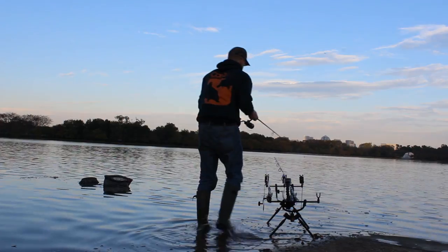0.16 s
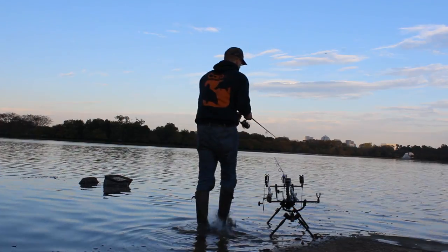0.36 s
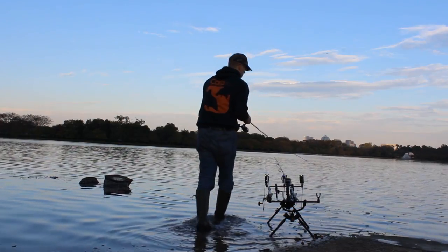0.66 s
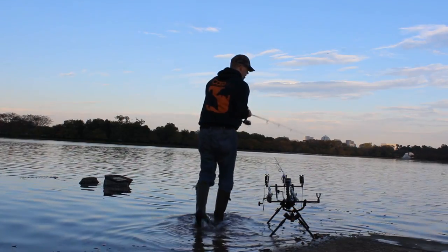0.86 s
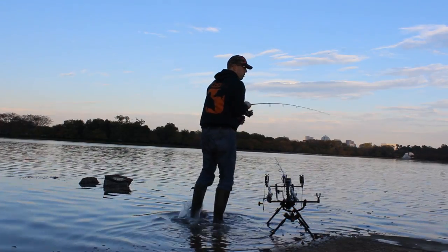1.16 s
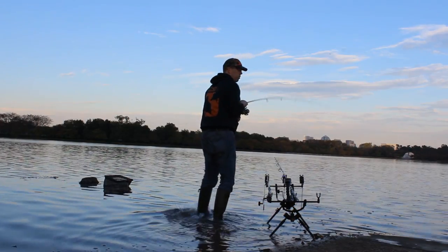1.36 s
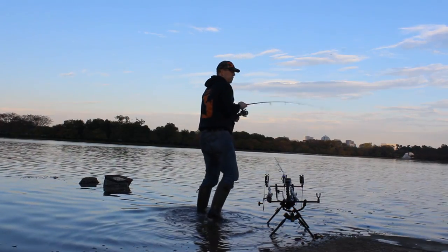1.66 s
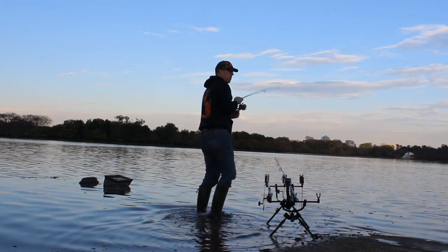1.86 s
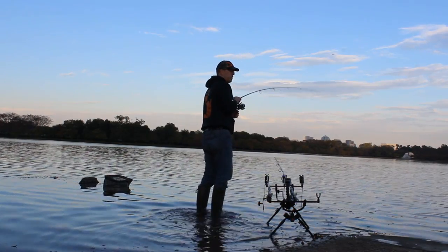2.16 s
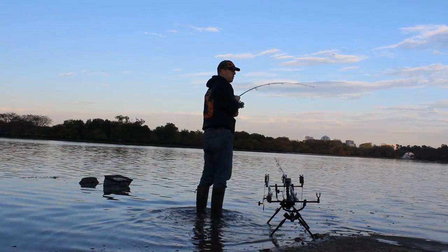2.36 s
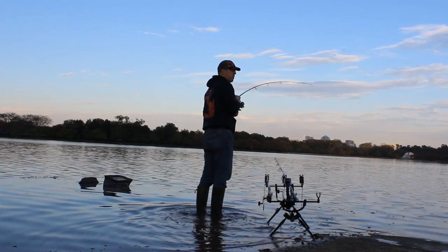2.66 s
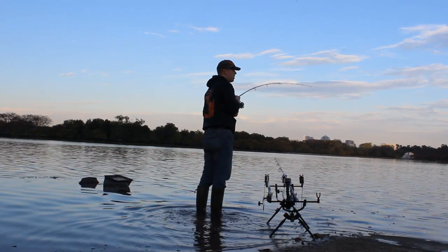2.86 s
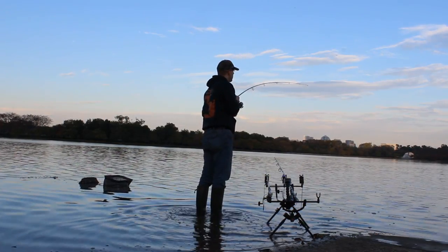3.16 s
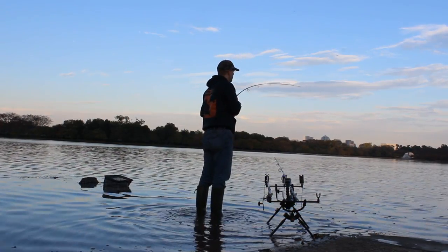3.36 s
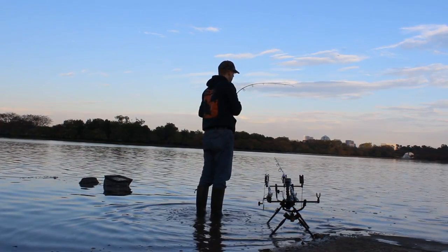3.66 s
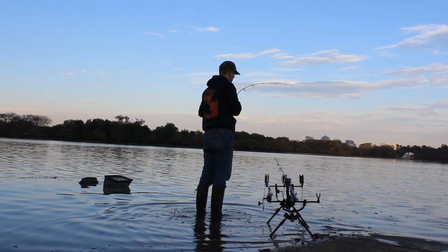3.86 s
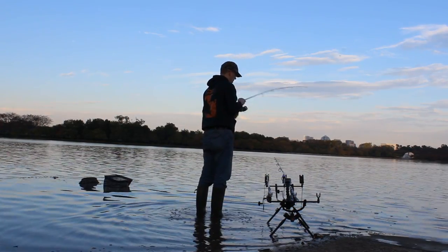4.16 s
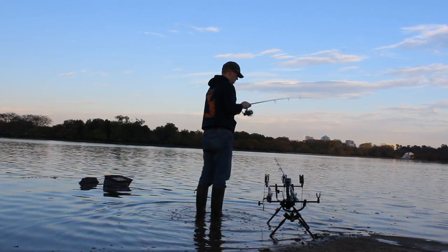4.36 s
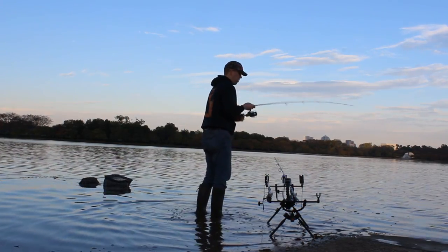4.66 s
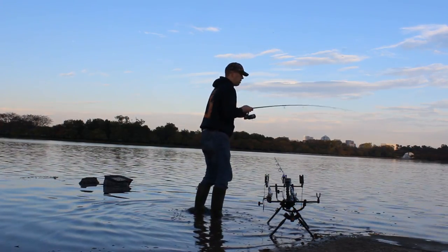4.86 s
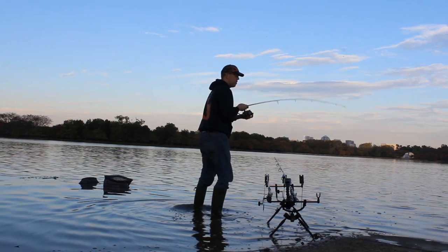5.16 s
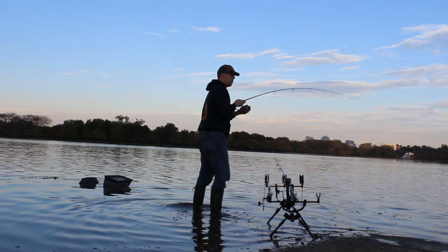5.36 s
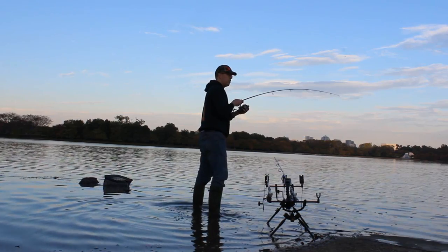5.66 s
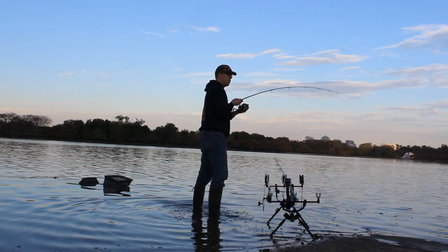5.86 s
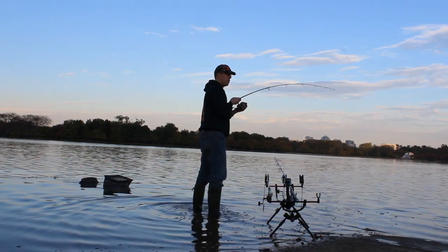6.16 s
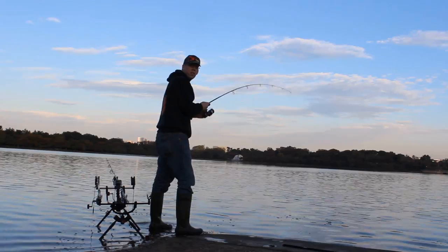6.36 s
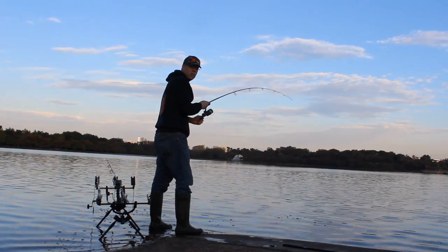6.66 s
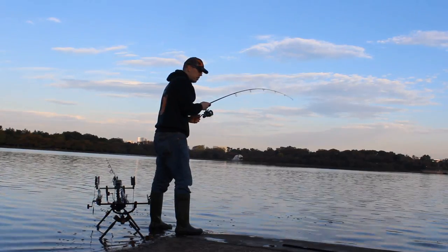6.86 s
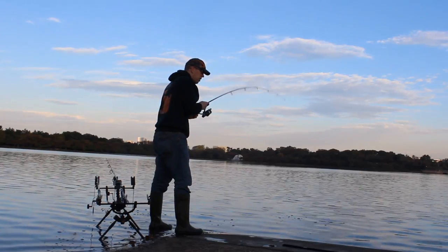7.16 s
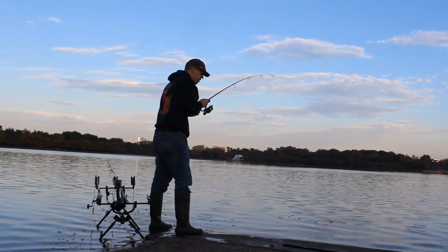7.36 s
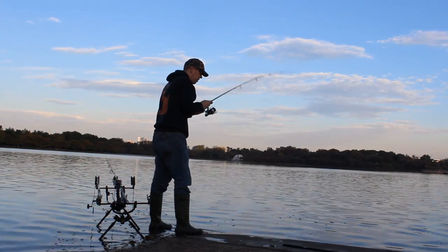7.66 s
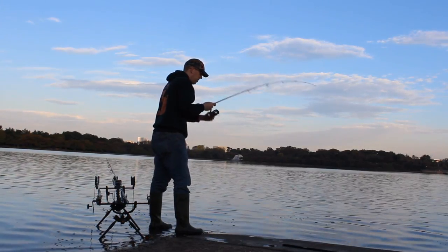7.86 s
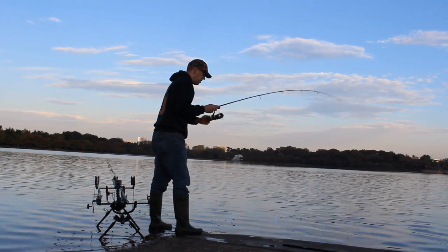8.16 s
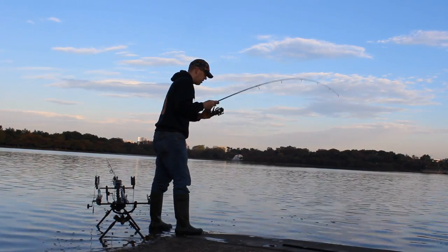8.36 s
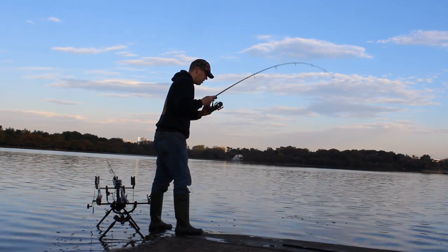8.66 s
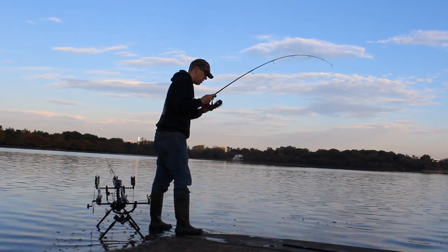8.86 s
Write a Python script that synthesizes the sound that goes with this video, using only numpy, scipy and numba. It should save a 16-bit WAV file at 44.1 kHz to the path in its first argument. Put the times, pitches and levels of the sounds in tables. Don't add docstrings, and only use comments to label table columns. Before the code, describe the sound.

A fishing reel clicks in bursts and stray ticks as boots slosh in shallow lake water, over distant engine revs and low road rumble.

```python
import sys
import numpy as np
from scipy import signal
from scipy.fft import rfft, irfft
from scipy.io import wavfile
from scipy.ndimage import uniform_filter1d
from numba import njit

SR = 44100
rng = np.random.default_rng(int(sys.argv[2]) if len(sys.argv) > 2 else 0)


def undo_db(level):
    steps = np.asarray(level, float) / 20
    return 10 ** steps


def generate_wav(sig):
    pcm = np.round(np.clip(np.atleast_2d(sig).T, -1, 1) * 32767).astype(np.int16)
    wavfile.write(sys.argv[1], SR, pcm)


N = 396900


def level(x, rms_db):
    return x * undo_db(rms_db) / np.sqrt(np.mean(x ** 2))


def curves(table):
    at_s, *columns = np.transpose(table)
    t = np.arange(N) / SR
    gate = uniform_filter1d(1. * (t > at_s[0]) * (t < at_s[-1]), size=200)
    return [np.interp(t, at_s, c) for c in columns] + [gate]


@njit
def band(x, hz, width_hz):
    y, b, l = np.empty(len(x)), 0., 0.
    g, k = np.tan(np.pi * hz / SR), width_hz / hz
    for i in range(len(x)):
        v = (b + g * (x[i] + 1e-18 - l)) / (1 + g * (g + k))
        b, l, y[i] = 2 * v - b, l + 2 * g * v, k * v
    return y


@njit
def bubbles(start_s, size, hz, t60_s, glide):
    out = np.zeros(N)
    for e in range(len(start_s)):
        i0, n, phase = int(start_s[e] * SR), int(t60_s[e] * SR), 0.
        for i in range(min(n, N - i0)):
            phase += 2 * np.pi * min(hz[e] * (1 + glide[e] * i / n) / SR, .45)
            out[i0 + i] += size[e] * np.sin(phase) * np.exp(-6.9 * i / n) * min(phase / 12, 1.)
    return out


def walk(rate_hz):
    hold = int(SR / rate_hz)
    steps = np.repeat(rng.standard_normal(N // hold + 1), hold)
    return 1.623 * uniform_filter1d(uniform_filter1d(steps, hold), hold)[:N]


def bursts(start_s, peak_db, rise_s, fall_s):
    marks = np.zeros(N)
    np.add.at(marks, (np.asarray(start_s) * SR).astype(int), undo_db(peak_db))
    t = np.arange(1500) / SR
    puff = (1 - np.exp(-(t / rise_s) ** 2)) * np.exp(-(t / fall_s) ** 2)
    return signal.fftconvolve(marks, puff)[:N] * np.sign(rng.standard_normal(N))


# start_s, teeth_passed
SPOOL_RUNS = [
    [(.1655, 0), (.1883, 1), (.2195, 3), (.2523, 5), (.3112, 8), (.3431, 10), (.3838, 14), (.4304, 20),
     (.4853, 30)],
    [(1.8832, 0), (1.9032, 1), (1.914, 2), (1.9575, 7)],
    [(2.3641, 0), (2.4016, 2), (2.4235, 3), (2.4564, 5), (2.5033, 7), (2.5662, 9), (2.5916, 10),
     (2.633, 11)],
    [(5.0828, 0), (5.1143, 1), (5.139, 2), (5.158, 3), (5.2014, 6), (5.247, 9), (5.2649, 10), (5.2929, 11)],
]
# first_db, last_db, body_db (against the pawl)
RUN_LEVELS = [
    (-29, -27.5, -13),
    (-41, -41, -11),
    (-42, -46, -8),
    (-41, -39, -4),
]


def spool_clicks():
    tooth_scatter_db, body_scatter_db = 2, 2.5
    clicks = []
    for run, (first_db, last_db, body_db) in zip(SPOOL_RUNS, RUN_LEVELS):
        at_s, teeth = np.transpose(run)
        tooth = np.arange(teeth[-1] + 1)
        chance = rng.standard_normal((len(tooth), 2)).T
        start_s = np.interp(tooth, teeth, at_s)
        peak_db = np.linspace(first_db, last_db, len(tooth)) + tooth_scatter_db * chance[0]
        clicks += list(np.transpose([start_s, peak_db, body_db + body_scatter_db * chance[1]]))
    return clicks


# start_s, peak_db, body_db
CHURN_CLICKS = [(0.5807, -39, -2), (0.6141, -38, 5), (0.6745, -38, 3), (0.7473, -37, -9), (0.8224, -43, 9),
                (0.864, -39, -8), (.9104, -47, -14), (.9843, -40, -8), (1.0835, -40.5, -3),
                (1.123, -42, -8), (1.1329, -46, -2), (1.1557, -35, -1), (1.2761, -33, -7), (1.3006, -44, 0),
                (1.3639, -40, 2), (1.4772, -30, -14), (1.5954, -43, -8), (1.6398, -39.5, 4),
                (1.6787, -43, -2), (1.7136, -40, -11), (1.752, -38, -7), (1.989, -41, -11),
                (2.1052, -43, -4), (2.1801, -44, -4), (2.2439, -44, -9), (2.2714, -40, -8),
                (2.3153, -37, -18)]
# start_s, peak_db, body_db
STANDING_CLICKS = [(2.7303, -37, -21), (2.7548, -41, -5), (2.9302, -41, -5), (3.1239, -42, -6),
                   (3.2656, -41, -6), (3.3933, -41, -5), (3.4865, -47, 0), (3.5415, -49, -10),
                   (3.5938, -48, 1), (3.6707, -48, 0), (3.8363, -49, -5), (4.0557, -51, -5),
                   (4.1341, -48, -3), (4.7382, -47, -7), (4.8171, -48, 0), (4.9267, -42.5, 0),
                   (5.037, -42, 7), (5.3094, -45, -6), (5.3747, -42, -2), (5.3991, -45, -8),
                   (5.7984, -37, -11), (6.5909, -39.5, -3), (6.761, -38, -6), (6.9133, -37.5, -6),
                   (7.2487, -40.5, -2), (8.985, -34, -6)]
# mode_hz, width_hz, gain_db
PAWL_MODES = [
    (6600, 620, -3),
    (8500, 1700, -5.5),
    (9830, 1200, -0.5),
    (12160, 1200, -1),
    (13300, 830, 1.5),
    (14200, 1300, -1),
    (15100, 1400, -3),
]


def clicker():
    clicks = list(CHURN_CLICKS) + list(STANDING_CLICKS) + spool_clicks()
    start_s, peak_db, body_db = np.transpose(clicks)
    snap = bursts(start_s, peak_db, rise_s=0.00053, fall_s=0.0027)
    pawl = 0
    for k, (mode_hz, width_hz, gain_db) in enumerate(PAWL_MODES):
        pawl = pawl + (-1) ** k * undo_db(gain_db) * band(snap, 1. * mode_hz, 1. * width_hz)
    body_hz, none = 4200., 0 * start_s
    t60_s = .007 + none
    scattered_hz = body_hz * (1 + 0.023 * rng.standard_normal(len(start_s)))
    body = bubbles(start_s + .0005, undo_db(peak_db + body_db), scattered_hz, t60_s, none)
    rim = bubbles(start_s + 0.00045, undo_db(peak_db + body_db - 3.5), 1.1 * body_hz + none, t60_s, none)
    return undo_db(4.0) * pawl + undo_db(12.0) * (body + rim)


WADING_ENDS_S = 5.5


def swarm(per_s, lo_hz, hi_hz, cycles, scatter_db):
    when, pitch, bulk, ring = rng.random((int(per_s * WADING_ENDS_S), 4)).T
    hz = lo_hz * (hi_hz / lo_hz) ** pitch ** 0.706
    size = undo_db(-scatter_db * np.log(bulk + 2e-3))
    out = bubbles(when * WADING_ENDS_S, size, hz, cycles * (.5 + ring) / hz, 0.07 + 0 * hz)
    return out / out[:int(WADING_ENDS_S * SR)].std()


# peak_s, slosh_db, rise_s (per 10 dB), fall_s (per 10 dB), spray_db (against the slosh)
BOOT_PUSHES = [(.2, -44, 0.018, 0.4, -8), (.48, -38.5, 0.19, 0.25, -3), (.7, -43, 0.25, .12, -5),
               (.83, -64, .02, 0.2, -4), (1.06, -43.5, 0.1, 0.067, -4), (1.17, -38.5, 0.056, 0.1, -3.5),
               (1.29, -42.5, 0.075, 0.25, -8), (1.41, -39.5, 0.16, 0.13, -3),
               (1.51, -42, 0.058, 0.11, -6.5), (1.93, -50, .09, 0.32, -6), (2.11, -52, 0.027, .06, -2),
               (2.19, -41, 0.034, 0.037, -5), (2.44, -60, .2, 0.19, 0), (5.25, -49.5, 0.13, 0.15, -5.5),
               (5.39, -56, 0.036, .1, 0)]


def wading():
    slosh = swarm(per_s=2200, lo_hz=2400, hi_hz=5100, cycles=25, scatter_db=3.2) * undo_db(1.6 * walk(35))
    spray = swarm(per_s=5000, lo_hz=4800, hi_hz=15800, cycles=28, scatter_db=2.4) * undo_db(1.2 * walk(60))
    gurgle = swarm(per_s=900, lo_hz=400, hi_hz=2300, cycles=24, scatter_db=2.8)
    t, push_power, spray_power = np.arange(N) / SR, 0, 0
    for peak_s, slosh_db, rise_s, fall_s, spray_db in BOOT_PUSHES:
        power = undo_db(slosh_db - 10 * np.maximum((peak_s - t) / rise_s, (t - peak_s) / fall_s)) ** 2
        push_power = push_power + power
        spray_power = spray_power + power * undo_db(spray_db) ** 2
    water = np.sqrt(push_power) * (slosh + undo_db(9.5) * gurgle)
    mist = np.sqrt(spray_power) * band(spray, 7500.0, 9000.)
    return undo_db(1.0) * (water + undo_db(-1.0) * mist)


# start_s, peak_db, bubble_hz, t60_s
DRIPS = [(.433, -21, 3480, 0.013), (.486, -23, 7750, .014), (.487, -26, 6060, .013),
         (.505, -17, 3400, 0.0062), (.823, -23, 6200, .006), (.856, -29, 5000, .0066),
         (.866, -30, 9500, .0059), (1.04, -35, 4330, 0.037), (1.157, -23, 4200, .02),
         (1.161, -25, 8450, 0.016), (1.31, -30, 3530, 0.024), (1.345, -31, 3660, 0.023),
         (1.381, -32, 4420, 0.061), (1.549, -30, 3330, 0.034), (1.716, -43, 4280, 0.1),
         (2.185, -28, 4500, 0.0091), (2.187, -31, 8000, .01), (2.192, -29, 7500, .006),
         (2.2, -31, 2900, .012), (2.34, -29, 4100, 0.011), (2.416, -37, 4040, .02),
         (2.606, -32, 4940, .008), (4.695, -39, 2950, .034), (5.027, -40, 4860, .011),
         (5.165, -32, 4830, .01), (5.238, -30, 6500, .0071), (5.38, -42, 8270, .06),
         (5.465, -39, 4320, .02), (5.53, -38, 7800, 0.014), (5.53, -35, 12400, .01)]
# start_s, peak_db, bubble_hz
BOOT_PLOPS = [
    (.214, -12.5, 750),
    (.22, -22, 446),
    (.992, -21.5, 1950),
    (1.159, -17, 1140),
    (1.269, -16, 1430),
    (1.622, -16.5, 1816),
    (2.1818, -13, 1070),
]


def drops():
    start_s, peak_db, bubble_hz, t60_s = np.transpose(DRIPS)
    plop_s, plop_db, plop_hz = np.transpose(BOOT_PLOPS)
    plop_t60_s, plop_glide, plop_crack_db = 0.026, 0.25, -11
    hits_s, hits_db = np.r_[start_s, plop_s], np.r_[peak_db, plop_db + plop_crack_db]
    crack = band(bursts(hits_s, hits_db, rise_s=0.00052, fall_s=0.0017), 4900.0, 5000.)
    plops = bubbles(plop_s, undo_db(plop_db), plop_hz, plop_t60_s + 0 * plop_s, plop_glide + 0 * plop_s)
    glide = 0.0027 / t60_s
    drips = bubbles(start_s, undo_db(peak_db), bubble_hz, np.clip(t60_s, .003, .2), glide)
    return drips + plops + undo_db(-3) * crack


# start_s, firing_hz, level_db
TRUCK_REVS = [(0, 133.4, -35), (1.5, 138, -36), (2.1, 139.9, -40), (2.75, 139.6, -38), (3.0, 141.5, -32),
              (3.8, 147, -29), (4.4, 151.5, -28.5), (4.62, 151, -28.5), (4.95, 138, -32), (5.1, 124, -33.5),
              (5.5, 116.7, -40), (5.7, 120.1, -27), (6.0, 122, -30), (6.3, 124, -28), (6.48, 126, -34)]


def truck():
    firing_hz, level_db, on = curves(TRUCK_REVS)
    t = np.arange(N) / SR
    lift_off_s, next_gear_s = 4.45, 5.55
    pulling_db, coasting_db = -5.5, -15.
    octave_db = np.where((t > lift_off_s) & (t < next_gear_s), coasting_db, pulling_db)
    octave_db = uniform_filter1d(octave_db, size=8000) - .35 * (level_db + 30)
    phase = 2 * np.pi * np.cumsum(firing_hz * (1 + 0.0034 * walk(12))) / SR
    firing = undo_db(1.5 * walk(14)) * np.sin(phase)
    octave = undo_db(octave_db + 2.5 * walk(18) + 1.5 * walk(3)) * np.sin(2 * phase)
    return np.sqrt(2) * on * undo_db(level_db) * (firing + octave)


# start_s, pitch_hz, level_db
ENGINE_DRONE = [
    (0, 108.4, -44),
    (1.1, 108.5, -32),
    (2.2, 105.7, -36.5),
    (2.9, 115.6, -34.5),
    (3.9, 105.8, -35.5),
    (5.0, 102.1, -32.5),
    (6.48, 95.93, -39),
]


def other_engine():
    pitch_hz, level_db, on = curves(ENGINE_DRONE)
    phase = 2 * np.pi * np.cumsum(pitch_hz * (1 + 0.0509 * walk(15))) / SR
    return np.sqrt(2) * on * np.sin(phase) * undo_db(level_db + 3.35 * walk(20))


def whistles(tables, waver):
    out = 0
    for table in tables:
        pitch_hz, level_db, on = curves(table)
        tone = np.sin(2 * np.pi * np.cumsum(pitch_hz * waver) / SR)
        out = out + np.sqrt(2) * on * undo_db(level_db) * tone
    return out


# start_s, end_s, pitch_hz, level_db
TRILLS = [
    (5.46, 6.48, 4601, -59),
    (2.68, 2.95, 6160, -73),
]


def cricket():
    waver = 1 + 0.0021 * walk(50)
    strokes = 1 + .6 * np.cos(2 * np.pi * np.cumsum(55 * (1 + .3 * walk(40))) / SR)
    throb = strokes * undo_db(1.8 * walk(70) + 1.2 * walk(5))
    trills = [[(start_s, pitch_hz, level_db), (end_s, pitch_hz, level_db)]
              for start_s, end_s, pitch_hz, level_db in TRILLS]
    return throb * whistles(trills, waver)


# start_s, length_s, top_hz, end_hz, level_db
CHIRPS = [
    (4.667, .026, 5950, 5950, -66),
    (4.746, .022, 6010, 6000, -63),
    (4.814, .025, 3940, 3700, -52),
    (4.824, .018, 6040, 5770, -57),
    (7.377, 0.021, 4050, 3900, -54),
    (7.4, .021, 4020, 3950, -55),
    (8.444, .026, 4000, 3700, -53),
    (8.468, 0.022, 3700, 2650, -50),
]


def birds():
    start_share, top_at = 0.68, 0.42
    chirps = []
    for start_s, length_s, top_hz, end_hz, level_db in CHIRPS:
        chirps.append([(start_s, start_share * top_hz, level_db),
                       (start_s + top_at * length_s, top_hz, level_db),
                       (start_s + length_s, end_hz, level_db)])
    return whistles(chirps, 1 + .004 * walk(170))


# start_s, level_db
SWELL = [
    (0, -1.5),
    (1.2, -0.5),
    (2.3, -1.5),
    (3.4, -0.5),
    (4.6, -1),
    (6.3, -1),
    (6.55, -1.5),
    (9, -2.5),
]
# freq_hz, density_db (per Hz)
ROAD_SPECTRUM = [(12, -40), (25, -35), (46, -8), (146, -5.5), (224, -9), (300, -10), (400, -15.5),
                 (705, -18.5), (1000, -17), (1400, -22), (1900, -29), (2900, -41.5), (4300, -51.5),
                 (7000, -59.5), (10000, -65)]


def road():
    swell_db, _ = curves(SWELL)
    freq_hz, density_db = np.transpose(ROAD_SPECTRUM)
    f = np.fft.rfftfreq(N, 1 / SR) + 1e-3
    coloured = rfft(rng.standard_normal(N)) * undo_db(np.interp(np.log(f), np.log(freq_hz), density_db))
    bass, roar, tyre = 1.52, 0.99, 0.033
    shares = [0] + 3 * [bass] + [roar] + 5 * [tyre]
    out = np.zeros(N)
    for k, share in enumerate(shares):
        octave = np.cos(np.pi / 2 * np.clip(np.log2(f / 16) - k, -1, 1)) ** 2
        flicker_db = .5 * walk(2.99)
        out += irfft(coloured * octave, N) * undo_db(share * (swell_db - swell_db.mean()) + flicker_db)
    return level(out, -25)


def scene():
    cut_s, dip_s = 6.482, 0.0076
    dip = np.clip(np.abs(np.arange(N) / SR - cut_s) / dip_s, .1, 1)
    near = clicker() + wading() + drops()
    far = truck() + other_engine() + cricket() + birds() + road()
    return (dip * (near + far))[None]


def low_pass(x):
    return signal.sosfilt(signal.butter(12, 16510, fs=SR, output="sos"), x)


def record(dry):
    hiss = level(band(rng.standard_normal(N), 13100.0, 26000.0), -62.5)
    top_cut = signal.ellip(12, .2, 45, 15850, fs=SR, output="sos")
    mix = signal.sosfilt(top_cut, dry + hiss) + .0011
    return low_pass(mix)


dry = scene()
out = record(dry)
generate_wav(out)
```